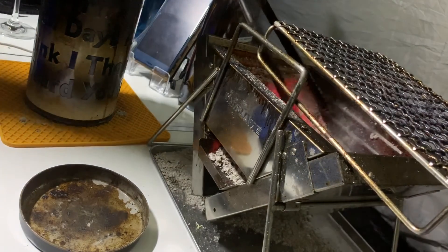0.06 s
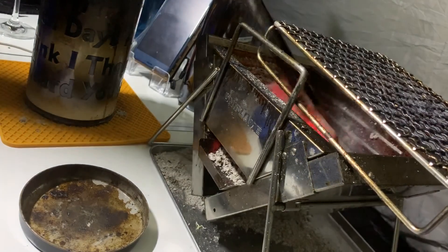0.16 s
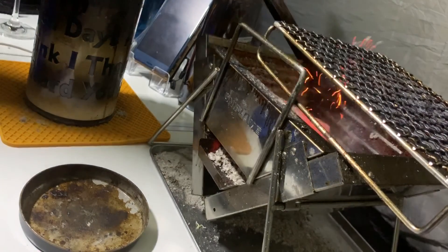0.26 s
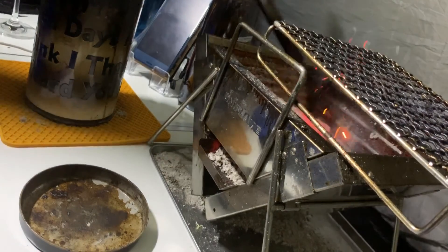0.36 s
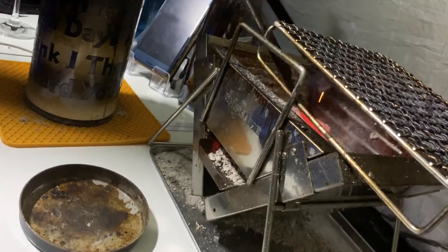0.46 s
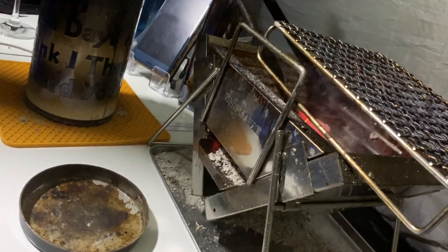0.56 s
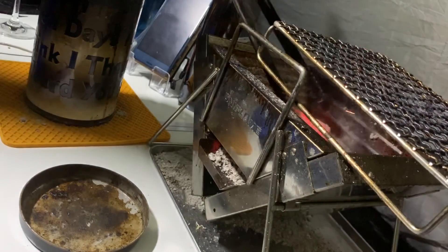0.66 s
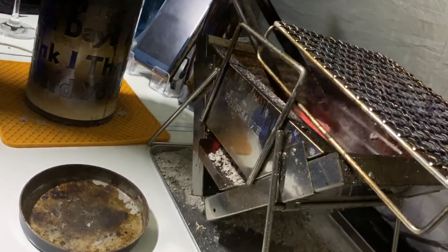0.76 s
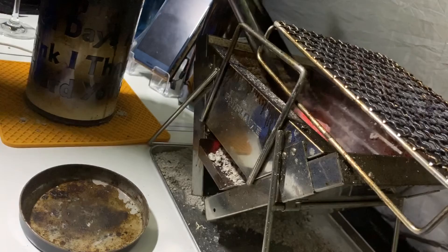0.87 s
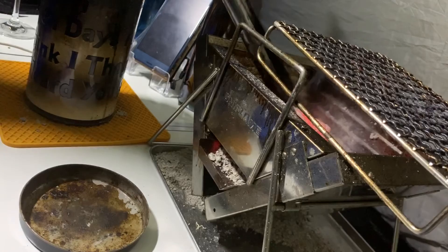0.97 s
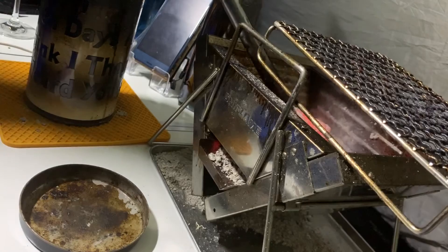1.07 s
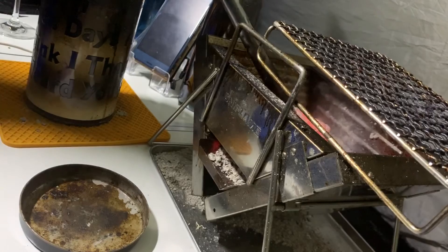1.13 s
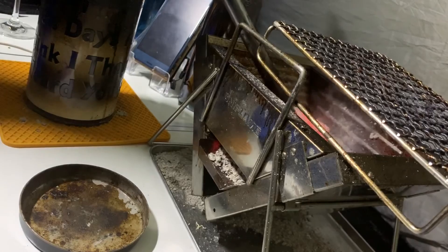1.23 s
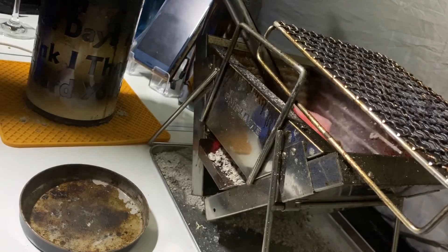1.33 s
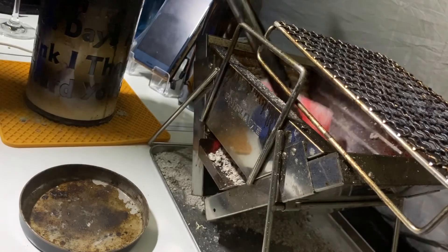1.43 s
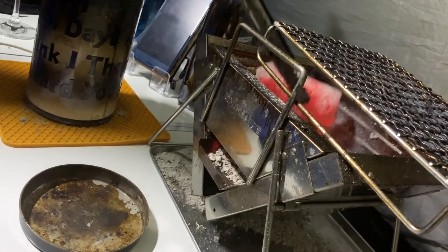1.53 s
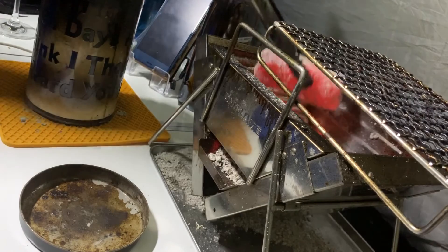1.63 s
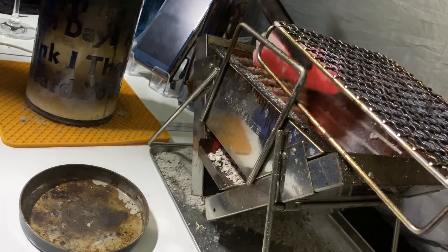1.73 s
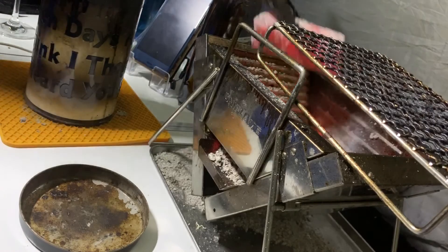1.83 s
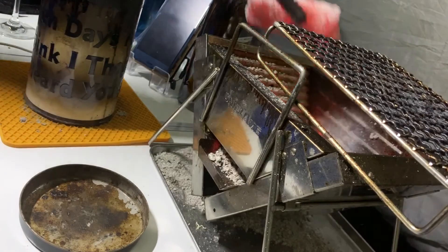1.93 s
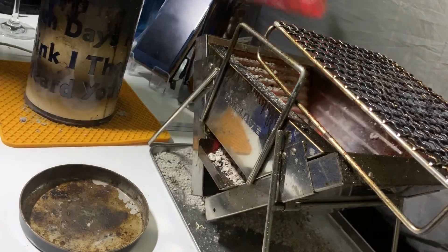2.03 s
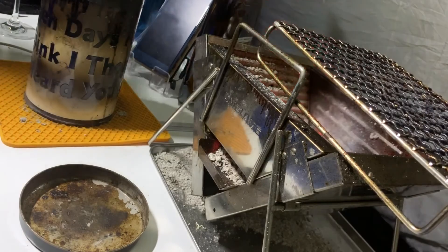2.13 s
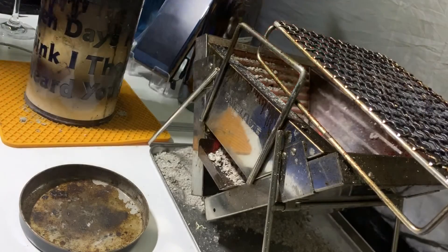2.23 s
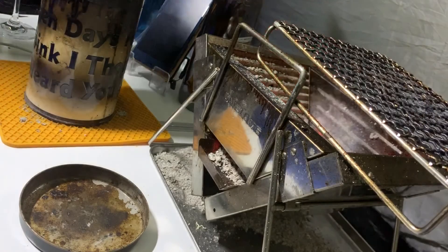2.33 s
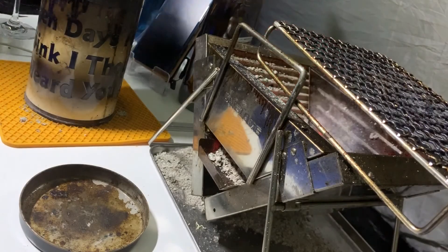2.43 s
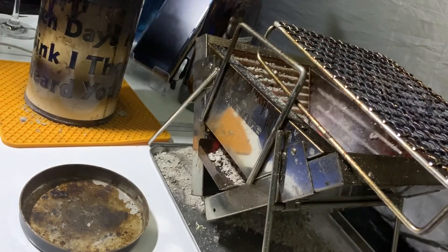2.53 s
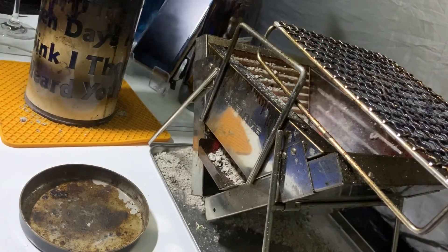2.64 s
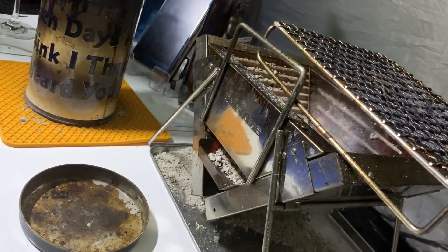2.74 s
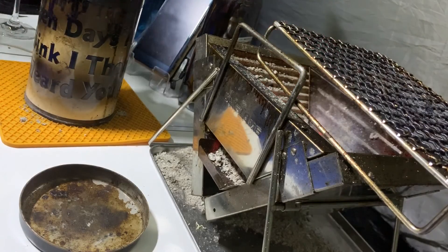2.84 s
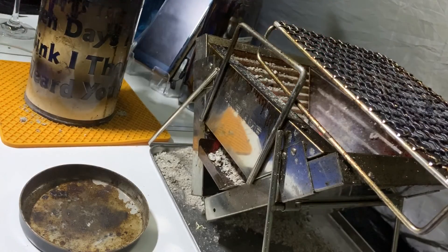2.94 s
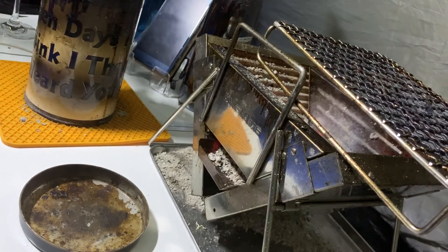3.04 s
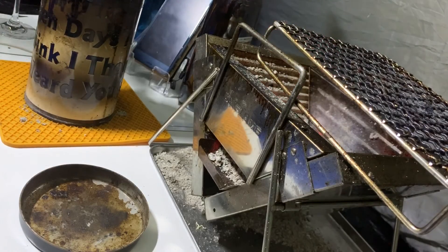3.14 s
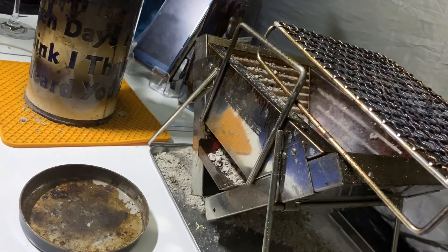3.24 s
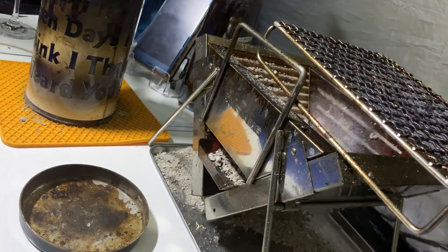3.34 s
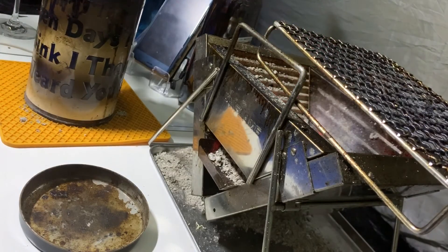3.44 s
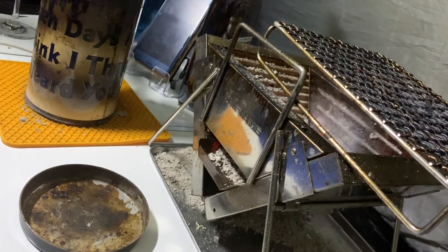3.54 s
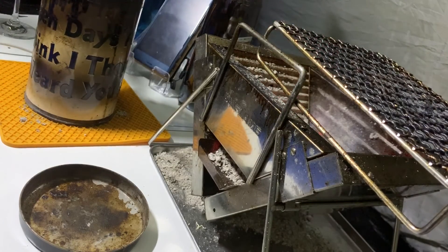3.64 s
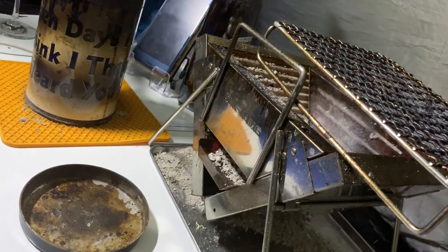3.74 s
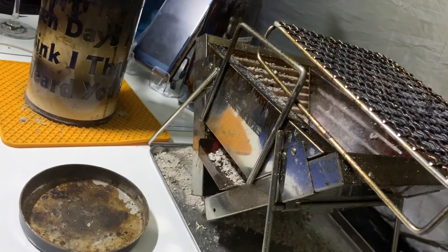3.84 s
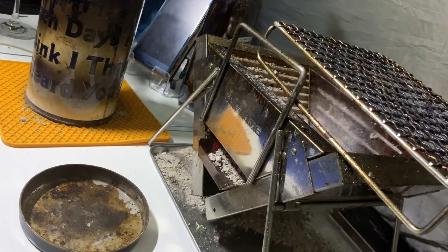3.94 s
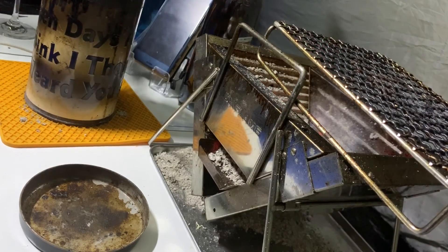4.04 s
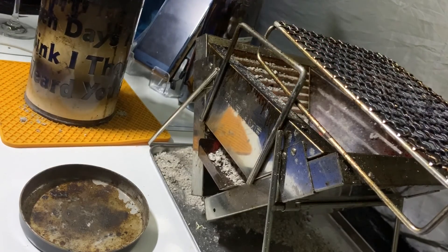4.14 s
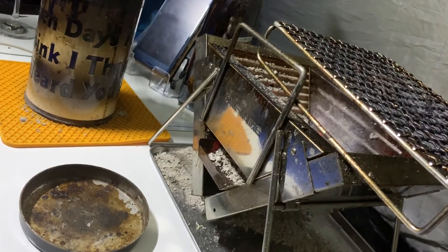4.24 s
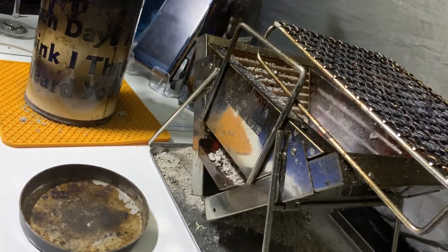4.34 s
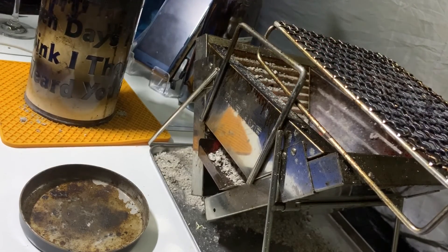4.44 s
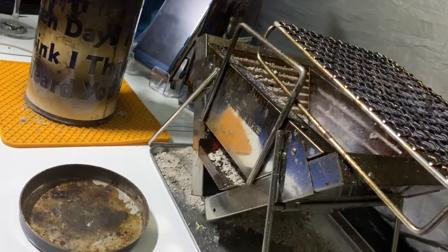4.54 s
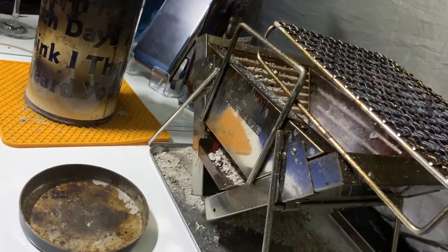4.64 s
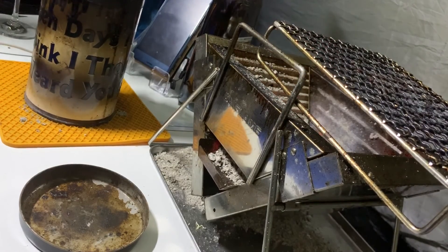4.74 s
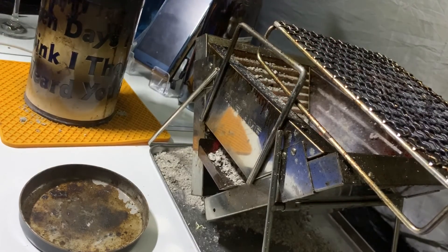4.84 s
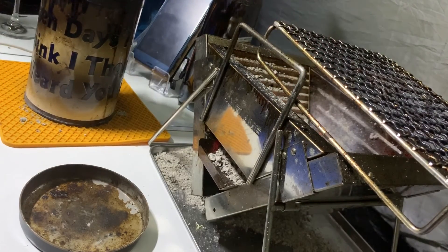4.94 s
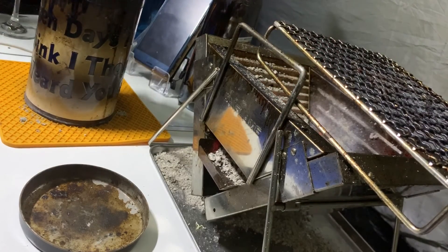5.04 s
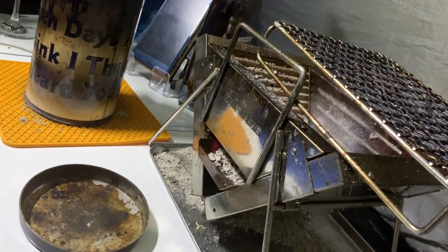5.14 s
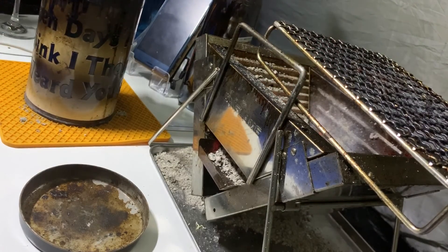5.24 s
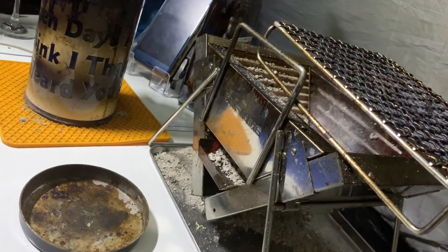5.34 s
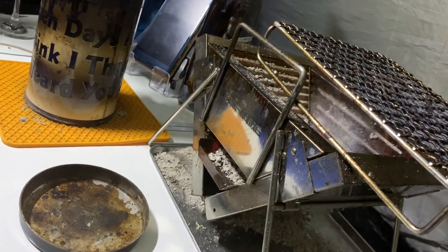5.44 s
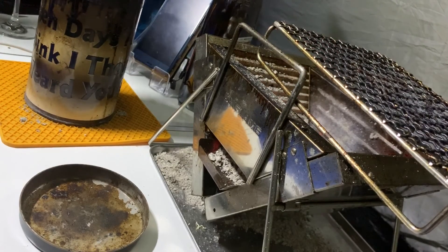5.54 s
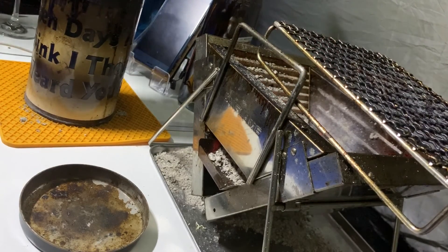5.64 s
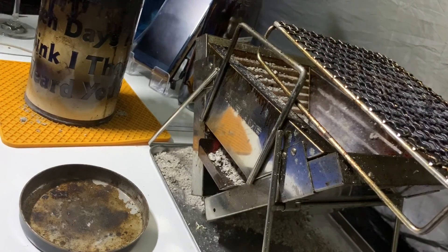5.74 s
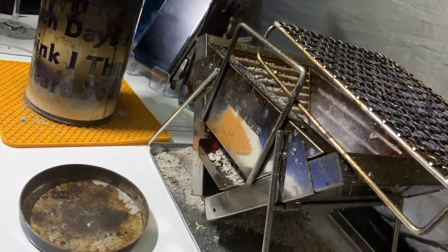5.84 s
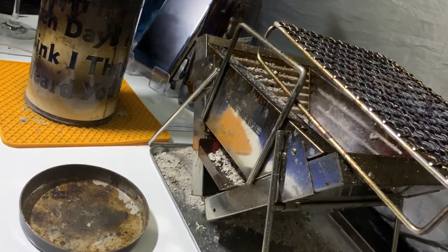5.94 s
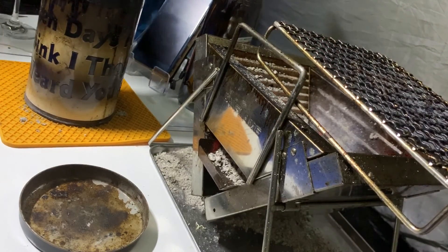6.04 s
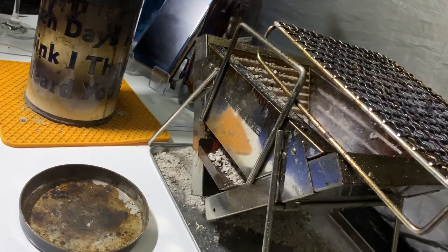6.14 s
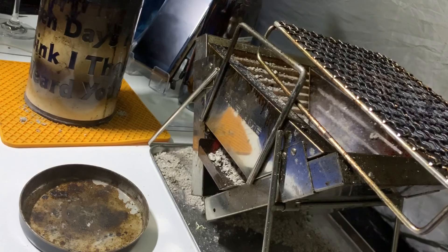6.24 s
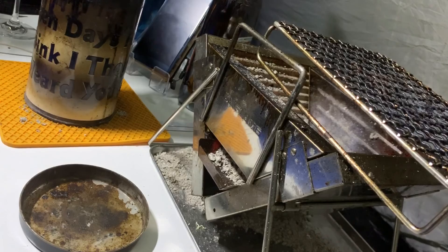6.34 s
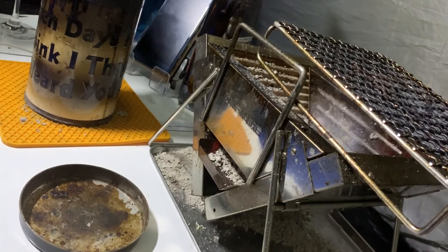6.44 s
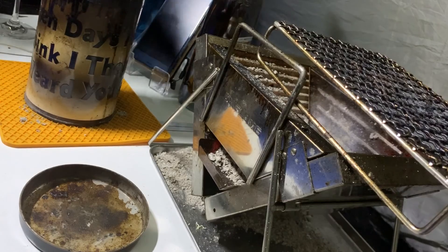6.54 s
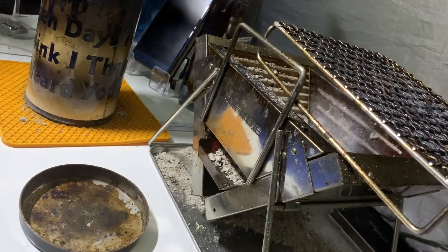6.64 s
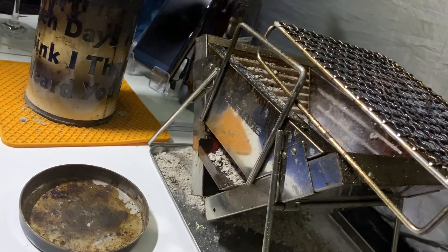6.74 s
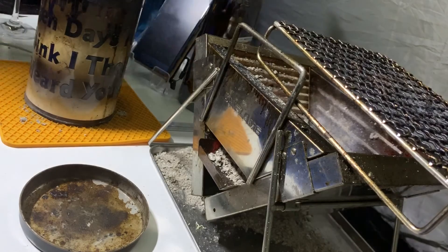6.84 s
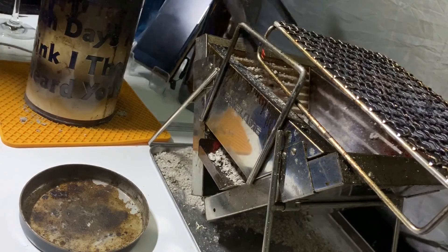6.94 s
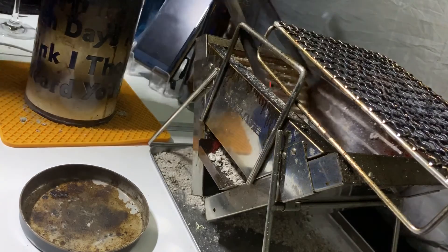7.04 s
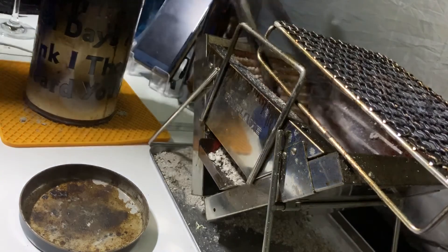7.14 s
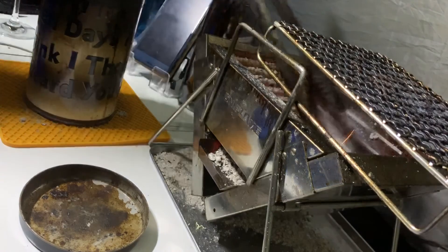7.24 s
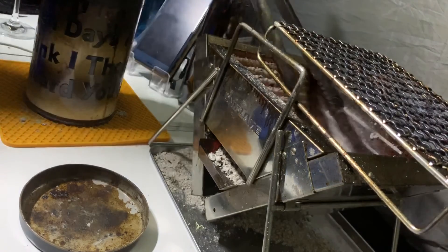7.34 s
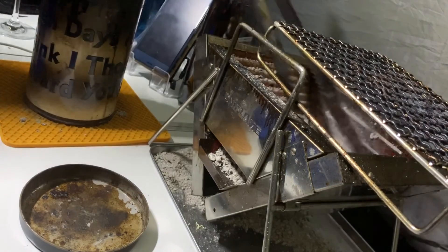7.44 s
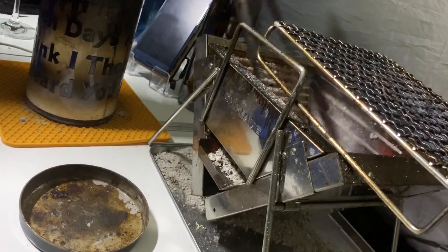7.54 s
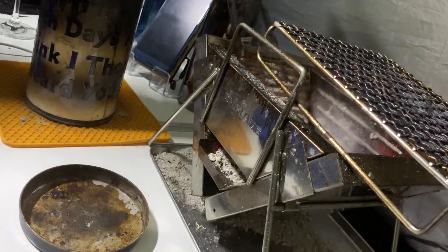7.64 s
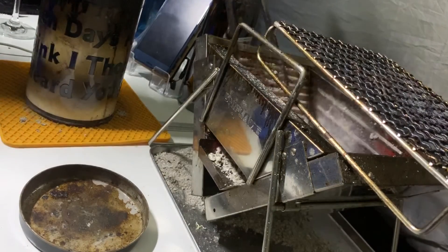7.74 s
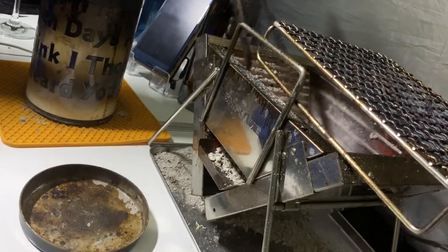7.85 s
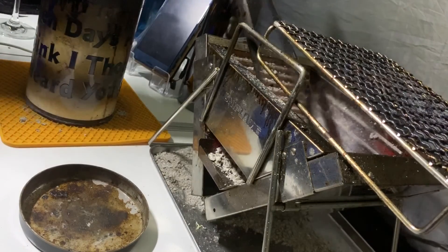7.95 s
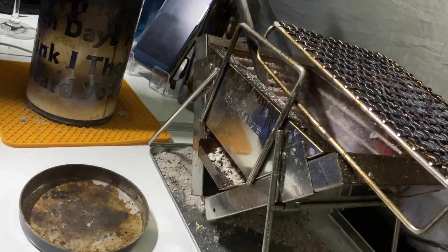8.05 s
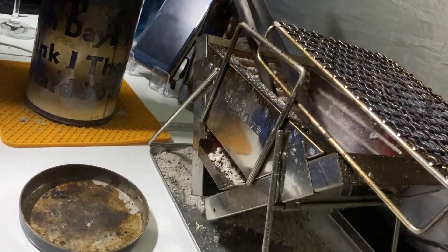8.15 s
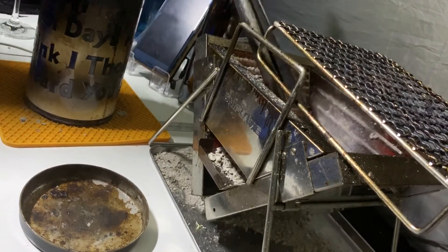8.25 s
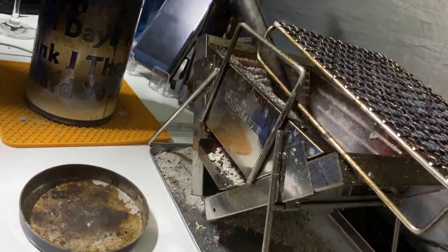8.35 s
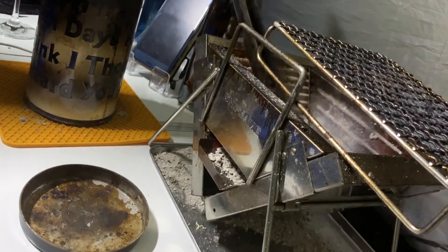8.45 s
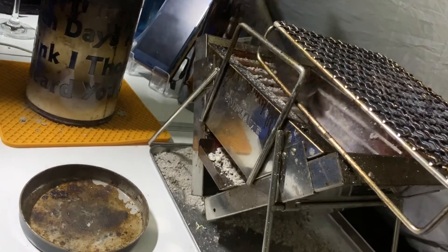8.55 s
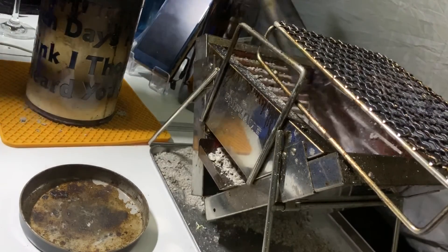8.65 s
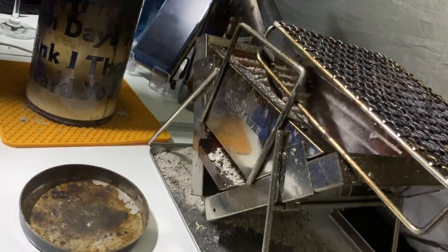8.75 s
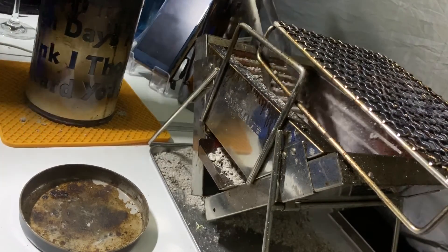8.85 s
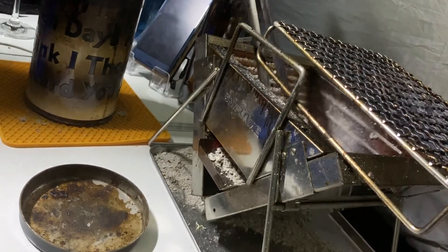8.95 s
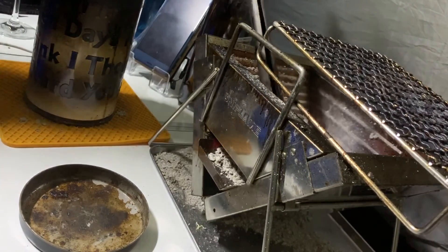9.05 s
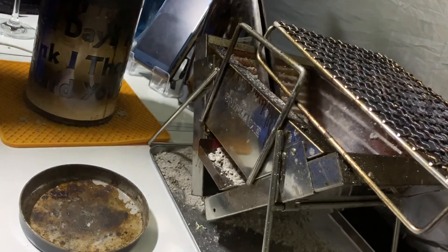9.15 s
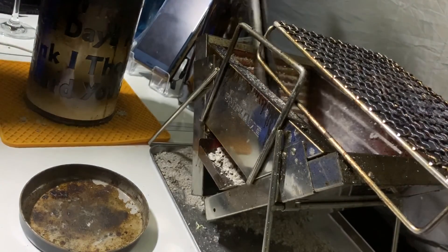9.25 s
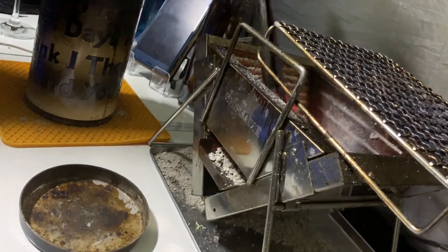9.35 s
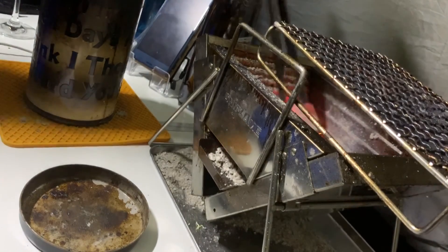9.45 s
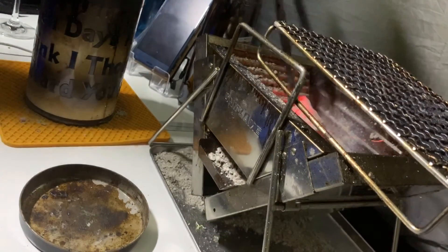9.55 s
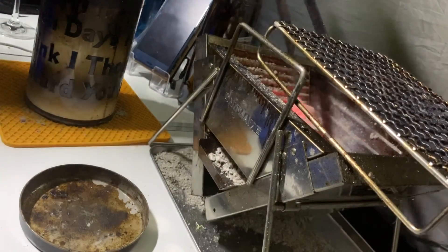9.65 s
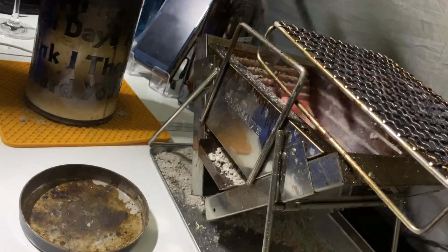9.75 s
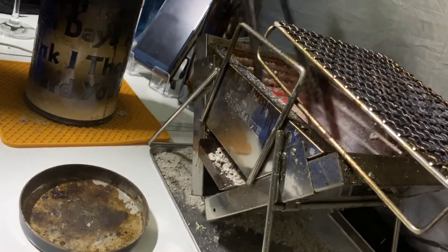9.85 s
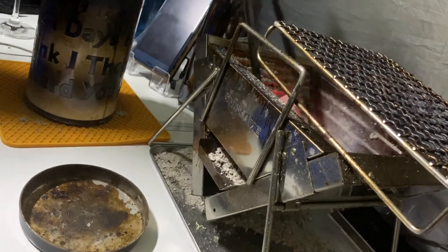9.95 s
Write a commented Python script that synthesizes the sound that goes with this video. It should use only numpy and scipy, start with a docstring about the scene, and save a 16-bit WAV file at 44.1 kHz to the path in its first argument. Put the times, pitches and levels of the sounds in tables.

```python
"""Tongs shifting charcoal in a sheet-metal grill

Outdoors, over low air rumble and a wavering hum, steel tongs scrape and rummage through glowing charcoal.
Scraping is random micro-fractures, filtered as loose lumps or ringing the modes of the tongs and the box.
Snaps, knocks and clinks are noise contacts, the last two with dying modes; slides are narrow-band noise. Two
microphones pick it up with partial coherence and a phase lag between the channels that varies with pitch."""
import sys
import numpy as np
from scipy import signal
from scipy.fft import rfft, irfft, next_fast_len
from scipy.io import wavfile
from scipy.ndimage import uniform_filter1d, map_coordinates

SR = 44100
rng = np.random.default_rng(int(sys.argv[2]) if len(sys.argv) > 2 else 0)


def generate_wav(signal):
    """Clip the signal to [-1, 1] and save it as 16-bit WAV at the path in sys.argv[1]."""
    frames = np.transpose(np.atleast_2d(signal))
    scaled = np.clip(frames, -1, 1) * 32767
    pcm = np.round(scaled).astype(np.int16)
    wavfile.write(sys.argv[1], SR, pcm)


N = 440559
TIME = np.arange(N) / SR
HIT_TIME = TIME[:SR // 3]

# Spectrum of the outdoor air. Each row: frequency in Hz, relative density in dB per Hz.
AIR_SPECTRUM = [(20, -18), (62, -4), (100, 0.5), (135, -7), (190, -9.5), (300, -16), (800, -28.5),
                (5000, -49), (16000, -55)]
# Swell of the hum. Each row: time in seconds, level in dB relative to HUM_DB.
HUM_SWELL_CURVE = [(2.4, -7), (4.5, 0), (9.3, -5.5)]
AIR_DB, HUM_HZ, HUM_DB = -52.5, 97.3, -50

# Strokes of the tongs through the charcoal. Each row: start in seconds, length in seconds,
# grit level in dB, dull rumble level in dB, swell from start to end in dB.
TONG_STROKES = [(0.0, 0.075, -49.5, -46, 10.5), (0.131, 0.11, -40, -51, 6), (0.218, 0.12, -47.5, -40, 5.5),
                (0.313, 0.024, -31, -47, 16.5), (0.356, 0.074, -59.5, -37, 6),
                (0.781, 0.2, -58, -55.5, -22.5), (0.957, 0.22, -49.5, -49, 2.5),
                (1.244, 0.25, -47, -46.5, -4), (2.877, 0.22, -50.5, -59, -5.5),
                (3.173, .17, -48.5, -51.5, 9.5), (3.403, 0.15, -53, -58.5, -15.5),
                (3.597, 0.21, -45, -49.5, -1), (3.837, 0.17, -48, -52, -9), (4.091, 0.1, -45, -50.5, -12),
                (4.28, 0.06, -50.5, -73, -41), (4.46, 0.053, -44, -48.5, -4),
                (4.531, 0.2, -46.5, -57, 22.5), (4.69, 0.1, -64, -44.5, 0.5), (4.846, 0.91, -63, -62, 0),
                (5.1, 0.18, -53, -58, -3.5), (5.454, 0.077, -47.5, -54, 0.5),
                (5.921, 0.18, -43.5, -47, 4.5), (6.208, 0.068, -53, -57, 10),
                (6.984, 0.23, -39.5, -44, -3.5), (7.186, 0.1, -45, -39, -2.5),
                (7.47, 0.15, -65.5, -49, -11.5), (7.67, 0.066, -43, -33.5, -3.5),
                (7.765, 0.039, -59, -41.5, 1.5), (7.877, 0.15, -39.5, -43.5, -10.5),
                (8.047, 0.29, -44, -48.5, 7.5), (8.444, 0.078, -41.5, -35.5, -2),
                (8.797, 0.27, -46, -47.5, -2), (9.077, 0.11, -44.5, -42.5, -0.5),
                (9.229, 0.12, -45.5, -44, 9), (9.383, 0.048, -39.5, -32, 2),
                (9.458, 0.093, -37, -37, -24.5), (9.531, 0.12, -49, -44.5, -20),
                (9.824, 0.021, -62, -49, -3.5)]
ATTACK_S, RELEASE_DB_PER_S = 0.014, 516.5
SETTLE_DB, SETTLE_DB_PER_S = -12, 137  # loose bits keep shifting after a stroke
# What the tongs work against. Each row: time in seconds, contact with steel in dB before a fixed offset
# in each layer, gain of the grit's treble in dB.
STEEL_CONTACT = [(.3, 5.5, 13), (.8, 10.5, 6), (1.45, -0.5, 8), (3.1, -15, 2), (4.5, -18, 5),
                 (5.2, -22, -3), (6, -18, -11), (7.1, 5, -0.5), (8.9, 9.5, 3.5), (9.3, 3.5, 7)]
# Squeezed hard on a lump, the tongs ring sharp. Values: from seconds, to seconds, rise as a share of pitch.
HARD_SQUEEZE = (.12, 0.39, 0.039)

# Modes of the tongs. Each row: frequency in Hz, relative level in dB, undamped decay by 60 dB in seconds.
TONG_MODES = [(2910, -9.5, 0.16), (3660, 0.5, 0.08), (4948, -5, 0.26), (5980, -5.5, .24), (7275, -5, .12),
              (8420, -3, 0.11), (9490, -7, 0.11), (12200, -4.5, 0.11), (14670, -6.5, 0.035)]
# Modes of the grill box. Each row: frequency in Hz, relative level in dB, undamped decay by 60 dB in seconds.
BOX_MODES = [(433.8, -8.5, 0.085), (655, 2.5, 0.018), (718, 2.5, 0.042), (860, -2.5, 0.035),
             (1106, -5, 0.035), (1655, -11, 0.036), (1915, -9.5, 0.022)]
# Spectra of the grit, snaps, steel clashes, thuds on the box and loose lumps.
# Each row: frequency in Hz, relative density in dB per Hz.
GRIT_SPECTRUM = [(500, -44), (1300, -19), (3100, -7.5), (3800, -3.5), (8700, -3), (10500, -0.5),
                 (14800, -7), (16000, -13.5)]
SNAP_SPECTRUM = [(400, -36), (1500, -19), (3000, -3), (4200, 8.5), (7000, 4.5), (9300, 15.5), (11000, 1.5),
                 (15000, -7)]
CLASH_SPECTRUM = [(500, -61.5), (1500, -3.5), (2700, -8), (4000, 4.5), (7300, 5), (9000, 12), (11000, 11.5),
                  (15500, 2)]
THUD_SPECTRUM = [(60, -12.5), (200, -18), (340, -10), (440, 2), (560, -5), (720, 3), (950, 1.5),
                 (1300, -13.5), (1800, -14), (2600, -18), (6000, -35)]
LOOSE_SPECTRUM = [(80, 4), (250, 0), (560, -0.5), (760, -10), (1100, -15), (1400, -18), (4000, -22.5)]

# Charcoal snapping and clicking. Each row: time in seconds, level in dB before the shifting resonances,
# brightness in dB per octave.
CHARCOAL_SNAPS = [(0.344, -12, -1), (0.483, -39, -2.5), (0.496, -41.5, -7), (0.561, -28, -4),
                  (1.155, -43, -7), (1.203, -41, -8), (1.337, -33.5, -1.5), (3.842, -37.5, -1),
                  (3.977, -42, -8), (4.122, -32, -1.5), (4.264, -42.5, 7), (4.494, -29.5, -7.5),
                  (5.169, -32, 19), (5.261, -33, 16), (5.463, -38, 3.5), (5.57, -42.5, 4),
                  (5.937, -38.5, -4.5), (6.091, -40.5, -35), (6.401, -51.5, -5), (6.464, -51, 2),
                  (7.097, -39, 6)]
# Lumps bumping the box. Each row: time in seconds, level in dB, brightness in dB per octave,
# mode that the blow favours in Hz.
BOX_KNOCKS = [(0.363, -31, 3, 718), (0.373, -31.5, 13, 718), (0.4, -26.5, 0.5, 718), (0.407, -30, 0.5, 655),
              (1.265, -28.5, -4, 1106), (2.889, -46, -2, 655), (3.33, -42.5, -15, 430),
              (3.684, -42, -26, 430), (4.72, -39.5, 3, 1106), (4.971, -49, 5, 718), (5.567, -34.5, 4, 655),
              (6.575, -39.5, 4, 655), (6.598, -48, 9, 655), (7, -32.5, 5.5, 655), (7.044, -27, 13, 860),
              (7.199, -33.5, 16, 718), (7.488, -46.5, 2.5, 718), (7.574, -34, -5.5, 718),
              (7.713, -38, 1, 434), (7.888, -30.5, 5, 718), (8.459, -39.5, 19.5, 860),
              (8.543, -24, 5.5, 434), (8.817, -36, -4.5, 434), (9.129, -39.5, -3, 434),
              (9.48, -18, -1.5, 434)]
# Tongs singing as they slide, as a thin squeal, a wide rasp or a hollow groan. Each row: start in seconds,
# length in seconds, level in dB, pitch in Hz, offset from it where the amplitude halves in Hz.
TONG_SLIDES = [(2.872, 0.23, -61, 2414, 28), (3.166, 0.2, -57.5, 2387, 28), (5.123, 0.19, -49, 7600, 1700),
               (5.922, 0.15, -47, 5000, 1430), (7.891, .4, -49, 860, 79.4)]
# Tongs striking steel. Each row: time in seconds, level in dB, brightness in dB per octave,
# mode that the blow favours in Hz, ring against clash in dB, damping by the grip as a factor.
STEEL_CLINKS = [(6.999, -16, 1.5, 5980, -3, 1.16), (7.041, -33.5, -9.5, 2910, -13.5, 2.9),
                (7.717, -16.5, -10.5, 7275, 5, 2.9), (7.888, -31.5, -30, 4950, 4, 4.1),
                (8.54, -16.5, -3.5, 3660, -1, 4.5), (8.813, -13.5, 3, 7275, -9, 1.54),
                (9.481, -38, -4, 5980, 3, 1.6)]

# Microphone pair. Each row: frequency in Hz, likeness from 0 to 1, left minus right in dB.
MIC_PAIR = [(400, .96, .5), (750, .96, -3.2), (1600, .75, -3), (3000, .35, -.5), (6300, .5, .5),
            (8300, .92, 0), (10500, .99, 0)]
# Phase lead of the left channel; from 10 kHz up it is the same for both places, to within whole turns. # Each
# row: frequency in Hz, lead for the grill in radians, lead for the loose charcoal to its left in radians.
LEFT_LEAD = [(400, 0, 0), (900, -.4, .5), (1600, .1, 1), (3000, -2, 2.5), (7000, -6, 6.3),
             (10000, -3.14, 9.42), (11700, -3.1, 9.45), (13000, -1.85, 10.7), (14000, 0, 12.57)]
# While the tongs work in the loose charcoal. Values: from seconds, to seconds.
PILE_SPAN = (2.2, 6.8)
EDGE_HZ = 16100  # upper band limit


def amp(db):
    """Decibels are twenty times the logarithm of an amplitude ratio."""
    return 10 ** (np.asarray(db) / 20)


def unit(x):
    """Division by the root mean square gives unit power."""
    return x / np.sqrt(np.mean(x ** 2) + 1e-20)


def hit_level(x, size=400):
    """The strength of a hit is the root mean square of its first 400 samples, here scaled to one."""
    return x / np.sqrt(np.mean(x[:, :size] ** 2))


def curves(rows):
    """Linear interpolation follows every column of a table through time."""
    s, *columns = np.transpose(rows)
    return [np.interp(TIME, s, c) for c in columns]


def over_hz(rows, hz):
    """Interpolation on a logarithmic frequency axis reads every column of a table."""
    f, *columns = np.transpose(rows)
    return [np.interp(np.log(hz + 1), np.log(f + 1), c) for c in columns]


def add(mix, s, sound):
    """Superposition: a sound is summed into the mix from time s, cut at the end."""
    part = mix[:, max(round(s * SR), 0):][:, :sound.shape[1]]
    part += sound[:, :part.shape[1]]


def blend(a, b, b_db):
    """Independent sounds add in power, so the sum is scaled to constant power."""
    return (unit(a) + amp(b_db) * unit(b)) / np.hypot(1, amp(b_db))


def through(x, response):
    """Convolution with an impulse response makes a resonator answer its excitation."""
    return signal.oaconvolve(x, response, axes=1)[:, :N]


def colour(x, spectrum, tilt_db=0, pivot_hz=6000, size=4096):
    """Minimum-phase filter: the Hilbert transform of the log gain gives the phase of a causal response."""
    hz = abs(np.fft.fftfreq(size, 1 / SR))
    octaves = np.log2(np.maximum(hz / pivot_hz, 1 / 4))
    tilt = np.minimum(tilt_db * octaves, 8)  # boost limited to 8 dB
    log_gain = np.log(amp(over_hz(spectrum, hz)[0] + tilt))
    response = np.exp(np.conj(signal.hilbert(log_gain)))
    taps = np.fft.ifft(response).real[:size // 2]
    return signal.oaconvolve(x, taps[None], axes=1)[:, :x.shape[1]]


def narrow(centre_hz, width_hz):
    """Noise confined to one resonance is heard as a wavering tone."""
    hz = np.fft.rfftfreq(next_fast_len(N), 1 / SR)
    a, b = rng.standard_normal((2, 2, len(hz)))
    resonance = 1 + ((hz - centre_hz) / width_hz) ** 2
    return unit(irfft((a + 1j * b) / resonance)[:, :N])


def wander(per_s, t=TIME):
    """Random drift of unit size: straight lines join per_s independent values a second."""
    return unit(np.interp(t * per_s, np.arange(8192), rng.standard_normal(8192)))


def shifting(x, depth_db, width_hz, hold_s, size=512):
    """As the contact moves, narrow resonances come and go: a random gain field over frequency and time."""
    hz, t, z = signal.stft(x, SR, nperseg=size)
    place = np.meshgrid(hz / width_hz, t / hold_s, indexing="ij")
    field = rng.standard_normal([int(p.max()) + 2 for p in place])
    drift = np.tanh(map_coordinates(field, place, order=1))
    gain = unit(amp(depth_db * unit(drift)))
    return signal.istft(z * gain, SR, nperseg=size)[1][:, :N]


def ring(modes, spread_db=0, favoured_hz=0, favoured_db=0, damping=1):
    """Modal decay: sinusoids die exponentially, and where the blow lands decides how much each one gets."""
    hz, db, t60 = np.transpose(modes)[:, :, None]
    distance = abs(hz - favoured_hz)
    db = db + spread_db * rng.standard_normal(hz.shape) + favoured_db * (distance == distance.min())
    phase = rng.random((2, len(modes), 1))
    decay = amp(db - 60 * damping * HIT_TIME / t60)
    return (decay * np.sin(2 * np.pi * (hz * HIT_TIME + phase))).sum(1)


def burst(t60, rise_s, tail_db, tail_t60):
    """Contact noise: a first crack, uneven chatter that dies fast, then a faint tail from things nearby."""
    crack = .5 * np.exp(-HIT_TIME / .001)
    chatter = amp(1.2 * wander(400, HIT_TIME) - 60 * HIT_TIME / t60)
    tail = amp(tail_db - 60 * HIT_TIME / tail_t60)
    rise = 1 - np.exp(-HIT_TIME / rise_s)
    return rng.standard_normal((2, len(HIT_TIME))) * (crack + chatter + tail) * rise


def background():
    """Broadband air rumble is shaped noise; the hum is a narrow resonance of noise that swells and fades."""
    swell_db = curves(HUM_SWELL_CURVE)[0]
    air = unit(colour(rng.standard_normal((2, N)), AIR_SPECTRUM, size=16384))
    hum = narrow(HUM_HZ, width_hz=3.1)
    return amp(AIR_DB) * air + amp(HUM_DB + swell_db) * hum


def stroke(length, swell_db=0):
    """Pressure envelope: a stroke bites, swells or eases as it goes, lets go, and the lumps settle."""
    t = TIME[:SR]
    after = np.maximum(t - length, 0)
    bite = np.minimum(t / ATTACK_S, 1)
    swell = amp(swell_db * (np.minimum(t / length, 1) - .5))
    release = amp(-RELEASE_DB_PER_S * after) + amp(SETTLE_DB - SETTLE_DB_PER_S * after)
    return bite * swell * release / (1 + amp(SETTLE_DB))


def stroke_levels():
    """Incoherent sources add in power: overlapping strokes give the grit and rumble levels through time."""
    power = np.zeros((2, N))
    for start, length, grit_db, rumble_db, swell_db in TONG_STROKES:
        levels = amp([[grit_db], [rumble_db]]) * stroke(length, swell_db)
        add(power, start, levels ** 2)
    return np.sqrt(power)


def friction(per_s, spread_db, grain_s, judder_db, judder_per_s):
    """Brittle friction is a random train of tiny fractures of uneven size, bunched by stick and slip."""
    uneven_db = spread_db * np.minimum(rng.exponential(1, N), 4)
    sizes = amp(uneven_db) * (rng.random(N) < per_s / SR)
    power = signal.lfilter([1], [1, -np.exp(-1 / (grain_s * SR))], sizes ** 2)
    judder = amp(judder_db * wander(judder_per_s))
    return unit(np.sqrt(power) * judder * rng.standard_normal((2, N)))


def crumbs(per_s=50, level_db=-8, tilt_db=-5):
    """Random impulses: small pieces break off under the tongs, each with the same tick at its own strength."""
    breaks = rng.uniform(.3, 1, N) * (rng.random(N) < per_s / SR)
    contact = burst(t60=0.07, rise_s=0.0003, tail_db=-26, tail_t60=0.14)
    tick = colour(contact, GRIT_SPECTRUM, tilt_db)
    return amp(level_db) * unit(through(np.array([breaks, breaks]), tick))


def bending(x, share=.003, per_s=12):
    """Pitch follows reading speed: changes of grip shift all modes a little; a hard squeeze raises them."""
    start, end, sharp = HARD_SQUEEZE
    squeezed = (TIME > start) & (TIME < end)
    place = np.cumsum(1 + sharp * squeezed) + share * SR / per_s * wander(per_s)
    return np.array([map_coordinates(channel, [place]) for channel in x])


def scraping(box_damping=2):
    """Fracture noise drives resonators: loose lumps hiss and rumble dully; on steel, tongs and box ring."""
    grit_level, rumble_level = stroke_levels()
    steel_db, bright_db = curves(STEEL_CONTACT)

    grains = friction(per_s=700, spread_db=4.1, grain_s=.0017, judder_db=2, judder_per_s=35)
    # pressed on the lump, the tongs ring less freely
    tongs = bending(through(grains, ring(TONG_MODES, damping=3)))
    tongs = shifting(tongs, depth_db=4, width_hz=700, hold_s=.06, size=256)
    grit = unit(colour(grains, GRIT_SPECTRUM)) + crumbs()
    grit = shifting(grit, depth_db=5.5, width_hz=200, hold_s=.12)
    grit = blend(grit, tongs, steel_db - 4.5)
    low_pass = signal.butter(2, 10000, fs=SR, output="sos")
    dull = signal.sosfiltfilt(low_pass, grit)
    grit = unit(dull + (grit - dull) * amp(bright_db))

    slips = friction(per_s=320, spread_db=2.4, grain_s=0.007, judder_db=2, judder_per_s=40)
    box = through(slips, ring(BOX_MODES, damping=box_damping))
    on_steel = blend(colour(slips, THUD_SPECTRUM), box, b_db=0)
    body = blend(colour(slips, LOOSE_SPECTRUM), on_steel, steel_db + 4)
    body = shifting(body, depth_db=3.5, width_hz=150, hold_s=.06, size=1024)
    return grit_level * grit + rumble_level * body


def snaps():
    """Sudden fracture gives a dry, glassy click; shifting resonances stand for the different lumps."""
    out = np.zeros((2, N))
    for s, db, tilt_db in CHARCOAL_SNAPS:
        contact = burst(t60=.036, rise_s=.0003, tail_db=-23, tail_t60=.11)
        add(out, s, amp(db) * hit_level(colour(contact, SNAP_SPECTRUM, tilt_db)))
    return shifting(out, depth_db=3.5, width_hz=420, hold_s=.1, size=256)


def knocks(ring_db=1, favoured_db=9):
    """Impact excites the modes of the box: a lump lands with a noisy thud and a hollow ring."""
    out = np.zeros((2, N))
    for s, db, tilt_db, favoured_hz in BOX_KNOCKS:
        contact = burst(t60=0.029, rise_s=0.0008, tail_db=-12, tail_t60=0.12)
        thud = hit_level(colour(contact, THUD_SPECTRUM, tilt_db, pivot_hz=780))
        modes = ring(BOX_MODES, spread_db=0.5, favoured_hz=favoured_hz, favoured_db=favoured_db)
        tone = hit_level(modes) * (1 - np.exp(-HIT_TIME / .001))
        add(out, s, amp(db) * hit_level(thud + amp(ring_db) * tone))
    return out


def slides(judder_db=17):
    """Stick-slip: steel on a lump sings around one pitch; the wider the band, the rougher the sound."""
    out = np.zeros((2, N))
    for start, length, db, pitch_hz, width_hz in TONG_SLIDES:
        judder = amp(judder_db * width_hz / pitch_hz * wander(260))
        song = unit(judder * narrow(pitch_hz, width_hz))[:, :SR]
        add(out, start, amp(db) * stroke(length) * song)
    return out


def clinks(t60=0.04, favoured_db=10):
    """Impact of steel on steel: a short broadband clash, then the modes of the gripped tongs ring on."""
    out = np.zeros((2, N))
    for s, db, tilt_db, favoured_hz, ring_db, damping in STEEL_CLINKS:
        contact = burst(t60, rise_s=0.00053, tail_db=-11, tail_t60=0.091)
        clash = hit_level(colour(contact, CLASH_SPECTRUM, tilt_db))
        modes = ring(TONG_MODES, spread_db=2, favoured_hz=favoured_hz, favoured_db=favoured_db,
                     damping=damping)
        tone = hit_level(colour(modes, CLASH_SPECTRUM, tilt_db))  # a dull blow leaves the high modes quiet
        add(out, s, amp(db) * hit_level(clash + amp(ring_db) * tone))
    return out


def scene():
    """Superposition of all that the tongs and the charcoal do, over the outdoor hum."""
    return background() + scraping() + snaps() + knocks() + slides() + clinks()


def record(dry):
    """Partial coherence: two microphones share sound. The phase difference between the channels depends on
    frequency and, below about 10 kHz, on the place too, while above it is the same for both places; then a band
    limit."""
    size = next_fast_len(N + 4096, True)
    hz = np.fft.rfftfreq(size, 1 / SR)
    first, second = rfft(dry, size)
    same, balance_db = over_hz(MIC_PAIR, hz)
    left = irfft(first * amp(balance_db / 2), size)[:N]
    right = (same * first + np.sqrt(1 - same ** 2) * second) * amp(-balance_db / 2)

    lead_hz, *leads = np.transpose(LEFT_LEAD)
    lags = [np.exp(-1j * np.interp(hz, lead_hz, lead)) for lead in leads]
    from_grill, from_pile = [irfft(right * lag, size)[:N] for lag in lags]
    inside = (TIME > PILE_SPAN[0]) & (TIME < PILE_SPAN[1])
    at_pile = uniform_filter1d(1. * inside, SR // 10)  # crossfade of 0.1 s
    pair = np.array([left, from_grill + at_pile * (from_pile - from_grill)])
    band_limit = signal.firwin(255, EDGE_HZ, window=("kaiser", 9), fs=SR)
    return signal.oaconvolve(pair, band_limit[None], "same")


dry = scene()
out = record(dry)
generate_wav(out)
```